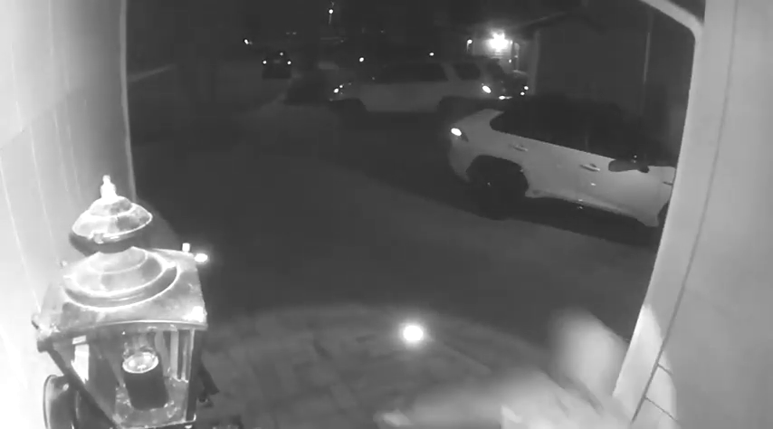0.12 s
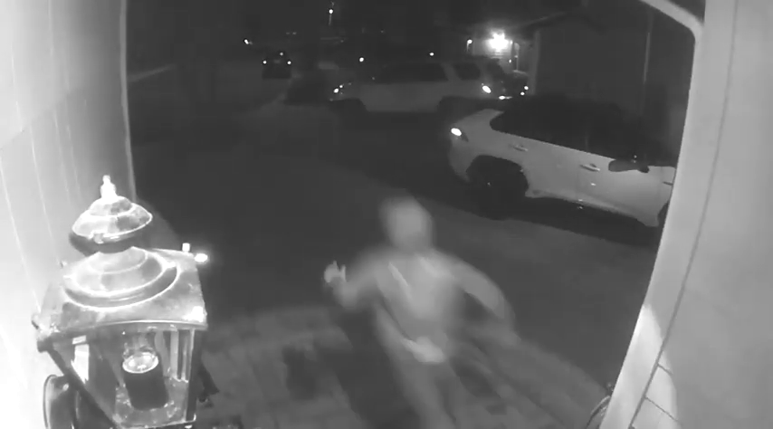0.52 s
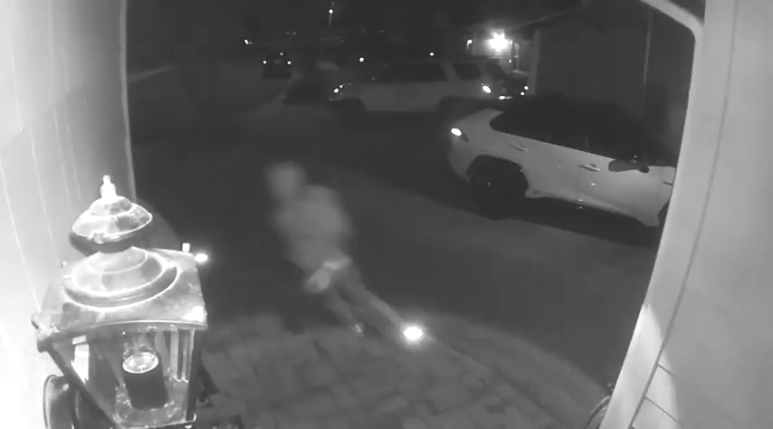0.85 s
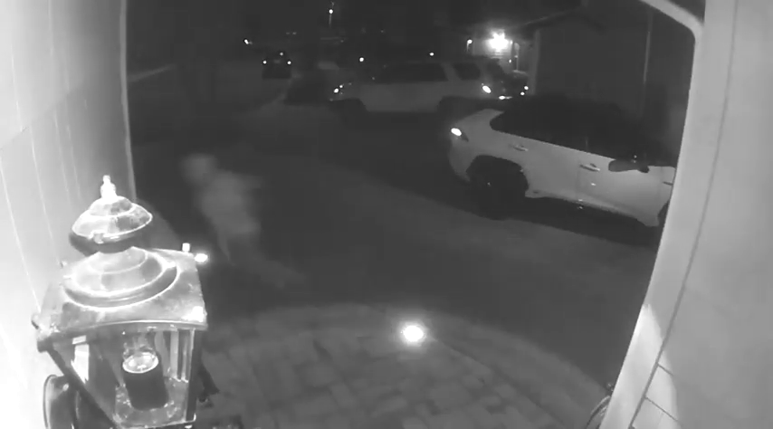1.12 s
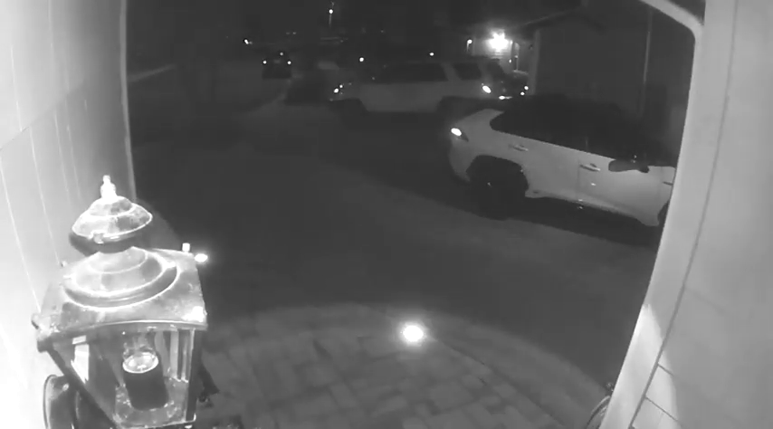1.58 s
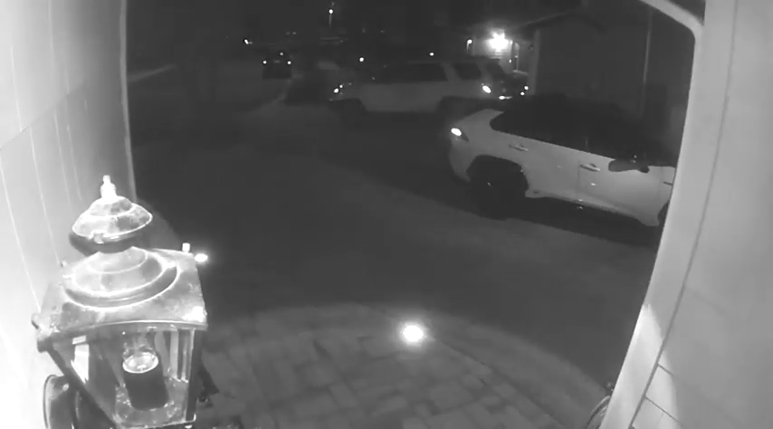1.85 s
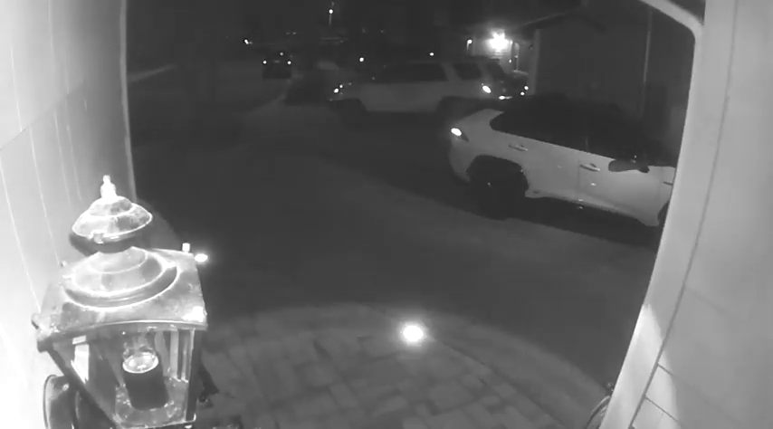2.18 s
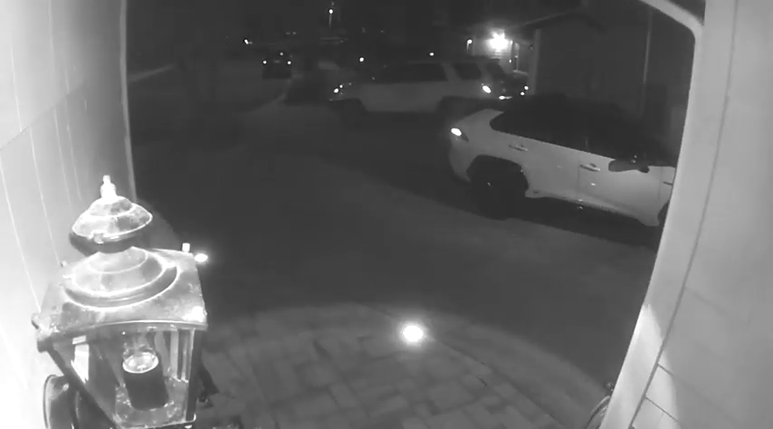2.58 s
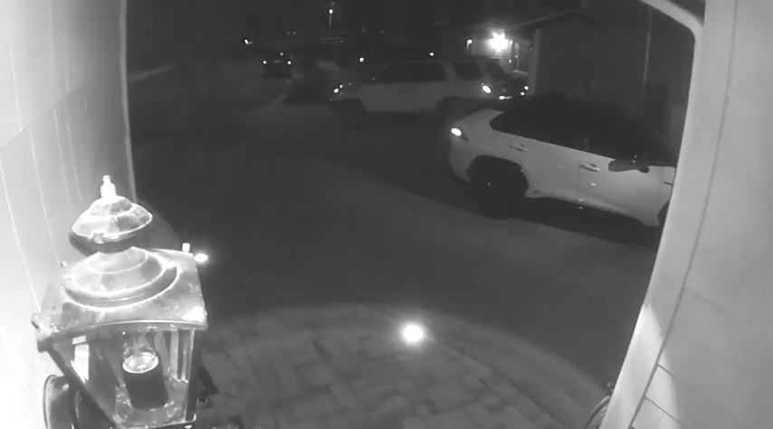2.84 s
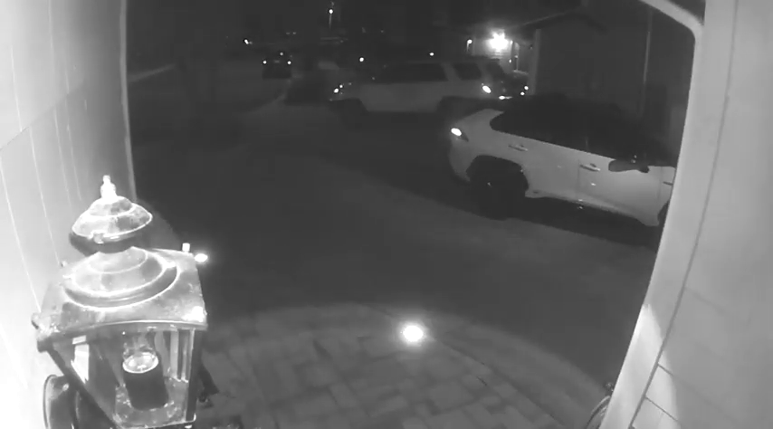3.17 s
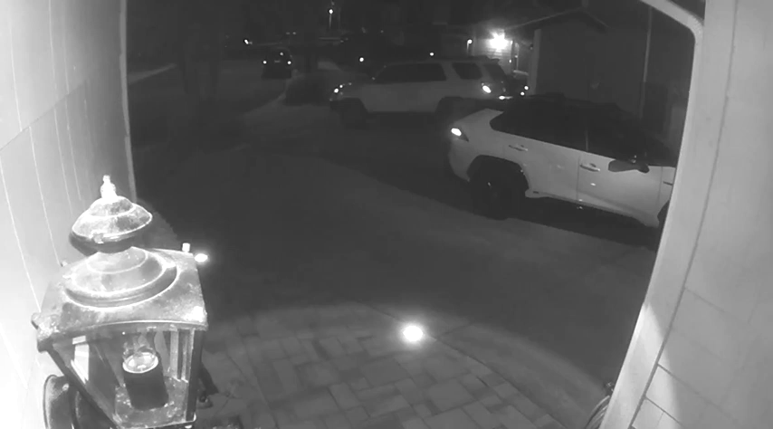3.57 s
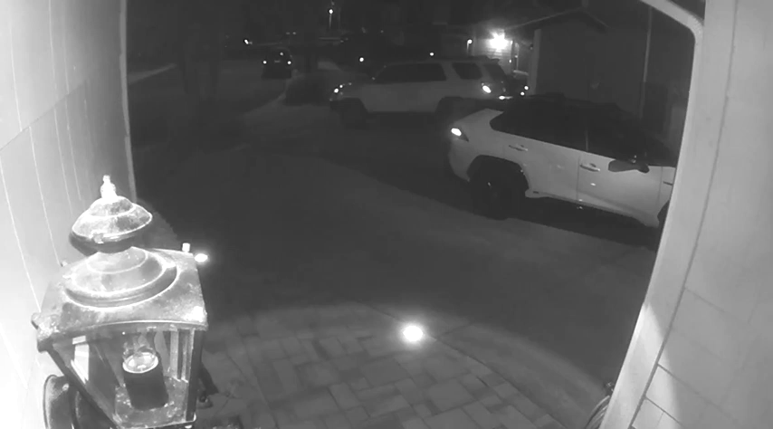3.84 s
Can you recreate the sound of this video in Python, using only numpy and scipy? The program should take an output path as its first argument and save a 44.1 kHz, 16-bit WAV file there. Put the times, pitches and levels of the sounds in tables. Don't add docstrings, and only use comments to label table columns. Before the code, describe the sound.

Someone's hurried footsteps scuff off across paving, following one loud low slam that overloads the microphone

```python
import sys
import numpy as np
from scipy import signal
from scipy.io import wavfile
from scipy.ndimage import uniform_filter1d

SR = 44100
rng = np.random.default_rng(int(sys.argv[2]) if len(sys.argv) > 2 else 0)


def int16_out(signal):
    q = np.round(np.clip(np.atleast_2d(signal).T, -1, 1) * 32767)
    wavfile.write(sys.argv[1], SR, q.astype(np.int16))


def ratio_of_db(decibels):
    return 10 ** (np.asarray(decibels, float) / 20)


N = 176400


def unit_rms(x):
    return x / np.sqrt(np.mean(x ** 2) + 1e-20)


def read_log(points, hz):
    point_hz, value = np.transpose(points)
    return np.interp(np.log(hz + 1), np.log(point_hz + 1), value)


def add(mix, start_s, sound):
    part = mix[round(start_s * SR):][:len(sound)]
    part += sound[:len(part)]


def resonate(x, hz, width_hz):
    turn = np.exp(2j * np.pi * np.cumsum(hz * np.ones(len(x))) / SR)
    r = np.exp(-np.pi * width_hz / SR)
    return 2 * (turn * signal.lfilter([1 - r], [1, -r], x / turn + 1e-18)).real


def thump(level_db, length_s, pitch_hz):
    t = np.arange(SR) / SR
    ring = np.sqrt(2) * np.sin(2 * np.pi * pitch_hz * t)
    return ratio_of_db(level_db) * ring * np.minimum(t * pitch_hz / 0.74, 1) * np.exp(-(t / length_s) ** 3)


def whistle(curve, width_hz):
    point_s, pitch_hz, level_db = np.transpose(curve)
    t = np.arange(N) / SR
    hz = np.interp(t, point_s, pitch_hz)
    fuzz = unit_rms(resonate(resonate(rng.standard_normal(N), hz, width_hz), hz, width_hz))
    level = ratio_of_db(np.interp(t, point_s, level_db, left=-120, right=-120))
    return (np.sin(2 * np.pi * np.cumsum(hz) / SR) + 0.325 * fuzz) * level


# freq_hz, density_db
AIR_SPECTRUM = [(20, -7), (50, -5.5), (90, -15.5), (250, -15), (600, -16), (1000, -21), (5000, -19.5),
                (8400, -21.5)]
# time_s, level_db
GATE_LEVEL = [(0, 21), (.3, 14), (.6, 11.5), (.9, 14), (.97, 7.5), (1.02, 9.5), (1.35, 10.5), (1.48, 6.5),
              (1.55, 5.5), (1.751, 6), (1.86, 4), (2.199, 3.5), (2.7, 5), (2.92, 2.5), (3.3, 0.5),
              (3.55, 3), (4, 1)]


def night_air():
    frames, hz = N // 256 + 5, np.fft.rfftfreq(1024, 1 / SR)
    real, imag, patches = rng.standard_normal((frames, 513, 3)).T
    patches = uniform_filter1d(uniform_filter1d(patches, size=14, axis=0), size=10, axis=1)
    swell = uniform_filter1d(rng.standard_normal(frames), size=12)
    patch_db, swell_db = 1.4 * unit_rms(patches), 1.0 * unit_rms(swell)
    z = (real + 1j * imag) * ratio_of_db(read_log(AIR_SPECTRUM, hz)[:, None] + patch_db + swell_db)
    hiss = ratio_of_db(-63.5) * unit_rms(signal.istft(z, nperseg=1024, noverlap=768)[1][:N])
    gate = ratio_of_db(np.interp(np.arange(N) / SR, *np.transpose(GATE_LEVEL)))

    hum_hz, width_hz = 147.7, 26
    hum = resonate(resonate(rng.standard_normal(N), hum_hz, width_hz), hum_hz, 2 * width_hz)
    return hiss * gate + ratio_of_db(-68.5) * unit_rms(hum)


# pitch_hz, level_db, t60_s
DOOR_MODES = [(37, -31, 0.94), (49.05, 4, 0.3), (57.48, -4.5, 0.52), (76.46, -8.5, .48),
              (94.35, -4.5, 0.23), (115.3, 0.5, 0.31), (127.1, 12.5, 0.16), (140, -10, .55),
              (155.1, -7.5, 0.38), (167.6, -12, 0.38), (220.4, -22, 0.39), (327.6, -12, 0.2),
              (434, -14.5, .16), (599, -18, 0.053)]
# start_s, level_db, length_s, pitch_hz
LEAF_REBOUNDS = [
    (.143, -22.5, .06, 163.2),
    (.26, -48.5, 0.38, 32),
]


def door():
    slam_s, slam_db, pulse_db, pulse_s = 0.002, -1.5, 9, 0.0025
    shock_db, shock_s = -4.36, 0.026
    rattle_db, rattle_t60_s, rattle_per_s = -26.5, 0.41, 2500
    t = np.arange(N) / SR
    clicks = rng.standard_normal(N) * (rng.random(N) < rattle_per_s / SR)
    out = unit_rms(resonate(clicks, 470, 1100)) * ratio_of_db(rattle_db - 60 * t / rattle_t60_s)
    out += ratio_of_db(pulse_db) * np.exp(-(t / pulse_s) ** 2)
    for pitch_hz, level_db, t60_s in DOOR_MODES:
        mode_db = slam_db + level_db + shock_db * np.exp(-t / shock_s) - 60 * t / t60_s
        out += ratio_of_db(mode_db) * np.sin(2 * np.pi * pitch_hz * (t - slam_s))
    for start_s, *row in LEAF_REBOUNDS:
        add(out, start_s, thump(*row))
    return out


# start_s, peak_db,
# pitch_hz, length_cycles
HEEL_TICKS = [(.052, -33, 2080, 10), (.1695, -51, 7100, 12), (.2045, -26, 3420, 1.2), (.205, -30, 5500, 3),
              (.32, -39, 7920, 21), (0.3841, -20, 1880, 3.5), (.385, -36.5, 483, 2.3),
              (.405, -45, 2040, 15), (.423, -44.5, 2110, 12), (0.4507, -40, 2100, 3.5),
              (0.521, -38, 8000, 27), (0.628, -35.5, 7630, 9.1), (.628, -41.5, 2220, 4.6),
              (0.7363, -33, 1710, 2.5), (.737, -43, 800, 4.2), (.7811, -52, 8050, 12),
              (.826, -46, 7150, 10), (.844, -46, 7110, 10), (.8939, -41.5, 7400, 9), (.901, -44, 7600, 8.8),
              (.991, -46, 5800, 4.4), (1.028, -36, 2630, 4.8), (1.058, -29, 5360, 6),
              (1.231, -28.5, 4730, 2.6), (1.503, -26.5, 3660, 1.05), (1.627, -34.5, 3100, 1.8),
              (1.65, -37, 4500, 6.6), (1.6528, -35.5, 4000, 4.7), (1.696, -42.5, 2090, 1.2),
              (1.753, -46, 1210, 1.6), (1.782, -48, 730, 3), (2.185, -60, 1760, 25),
              (2.306, -55.5, 2080, 12), (2.34, -54, 1780, 6), (2.401, -48, 2050, 5.3),
              (2.424, -41.5, 1870, 3), (2.44, -43.5, 2280, 5), (2.545, -37.5, 4770, 9.4),
              (2.547, -46, 1020, 4.3), (2.722, -46, 1200, 4.4), (3.004, -48, 4680, 5.7),
              (3.06, -51, 1690, 3.3), (3.083, -54, 2000, 3.4), (3.32, -50, 333, 0.83),
              (3.356, -48.5, 2210, 7), (3.358, -44, 4800, 3)]


def heel_ticks():
    out = np.zeros(N)
    for start_s, peak_db, pitch_hz, cycles in HEEL_TICKS:
        turns = np.arange(441) / SR * pitch_hz
        shape = np.minimum(2 * turns, 1) * np.exp(-(turns / cycles) ** 2)
        add(out, start_s, ratio_of_db(peak_db) * np.sin(2 * np.pi * turns) * shape)
    return out


def wall_echo(heels):
    wall_s, wall_db, corner_s = 0.0092, -7, 1.4
    out = heels.copy()
    add(out, wall_s, ratio_of_db(wall_db) * heels[:round(corner_s * SR)])
    return out


# freq_hz, t60_s
PORCH_T60 = [(200, 0.64), (600, 0.62), (2000, 0.42), (7000, 0.37)]


def porch_echo(x):
    taps = np.zeros(SR // 2)
    at = np.arange(300, SR // 2 - 20, 20)
    taps[at + rng.integers(0, 20, len(at))] = rng.choice([-1., 1.], len(at))
    hz, t, z = signal.stft(taps, SR, nperseg=256)
    decay_db = -60 * t / read_log(PORCH_T60, hz)[:, None]
    tail = signal.istft(z * ratio_of_db(decay_db), SR, nperseg=256)[1]
    return signal.fftconvolve(x, tail / np.linalg.norm(tail))[:N]


def grit(length_s, level_db, centre_hz, rise_share):
    grains_per_s, spread_db, broad_db, width_hz = 5300, 1.5, -16.5, 0.75 * centre_hz
    t = np.arange(-2205, 6615) / SR
    hit, sign, size = rng.random((len(t), 3)).T
    grains = (hit < grains_per_s / SR) * np.sign(sign - .5) * ratio_of_db(-spread_db * np.log(size + 0.0011))
    hiss = unit_rms(resonate(resonate(grains, centre_hz, width_hz), centre_hz, 2.3 * width_hz))
    hiss = hiss + ratio_of_db(broad_db) * unit_rms(np.diff(grains, prepend=0))
    hiss = signal.sosfilt(signal.butter(3, .45 * centre_hz, "high", fs=SR, output="sos"), hiss)
    skewed = np.where(t < 0, t / rise_share, t / (1 - rise_share))
    return ratio_of_db(level_db) * hiss * np.exp(-abs(skewed / (1.246 * length_s)) ** 2.1)


# peak_s, length_s, level_db, centre_hz
SOLE_SCUFFS = [(.09, 0.018, -44.5, 3830), (0.183, 0.021, -42.5, 4370), (.25, .065, -54, 3930),
               (.36, 0.018, -53, 2280), (0.637, 0.025, -48.5, 2370), (0.668, 0.055, -49.5, 5950),
               (0.85, 0.032, -49.5, 4730), (.9, 0.035, -51.5, 5160), (1.059, 0.019, -39.5, 3400),
               (1.104, 0.11, -45.5, 4500), (1.154, 0.026, -36, 4700), (1.397, 0.029, -43, 4650),
               (1.542, .03, -64, 2300), (1.6, 0.041, -53.5, 3850), (1.655, 0.039, -48, 3920),
               (1.78, 0.057, -63.5, 4900), (1.92, 0.036, -52, 4500), (1.95, 0.044, -59.5, 4200),
               (2.025, 0.057, -59, 6020), (2.216, 0.042, -64, 4300), (2.312, 0.047, -56.5, 3740),
               (2.44, 0.08, -56.5, 1800), (2.445, .04, -59.5, 5200), (2.59, 0.065, -52, 4380),
               (2.758, 0.056, -60.5, 5292), (2.765, 0.046, -57, 1250), (2.996, 0.063, -64, 2004),
               (3.075, 0.046, -61.5, 1837), (3.084, .02, -61, 5500), (3.33, 0.046, -65.5, 4900),
               (3.355, 0.072, -64, 1900), (4, 0.033, -61.5, 4360), (3.689, 0.046, -64.5, 1800),
               (3.786, 0.012, -73, 1900), (3.868, 0.059, -64.5, 1200)]
# peak_s, length_s, level_db, centre_hz
FLAT_SLAPS = [
    (0.3792, 0.034, -38, 3900),
    (0.988, 0.042, -47.5, 4970),
    (1.031, 0.021, -39, 4500),
    (1.231, 0.048, -49.5, 5000),
    (1.503, 0.056, -52.5, 3800),
    (2.549, 0.063, -51.5, 4350),
]


def scuffs():
    out = np.zeros(N)
    for table, rise_share in ((SOLE_SCUFFS, 0.48), (FLAT_SLAPS, 0.015)):
        for peak_s, *row in table:
            add(out, peak_s - 0.05, grit(*row, rise_share))
    return out


# start_s, peak_db, pitch_hz, ring_s, scatter_db (re knock)
FOOTFALLS = [(0.383, -33.5, 905, 0.0026, -10), (0.522, -65, 1190, 0.0034, 13),
             (.736, -35.5, 505, 0.0029, -12), (.990, -39.5, 308, 0.0045, -20), (.999, -42, 308, 0.0037, -6),
             (1.231, -29, 544, 0.0065, -18.5), (1.5026, -33, 1020, 0.0024, -13.5),
             (1.75, -44.5, 533, 0.0043, -5), (2.008, -57, 354, 0.013, -1.5), (2.278, -66, 353, 0.0069, 5.5),
             (2.542, -47.5, 440, 0.0019, 1.5), (2.723, -50, 500, 0.0085, -6),
             (2.958, -62.5, 560, 0.0043, -1.5), (3.353, -58, 1110, 0.003, -2.5),
             (3.666, -62, 303, 0.0058, 1.5), (3.82, -63, 610, 0.0066, 1)]


def footfalls():
    out = np.zeros(N)
    t = np.arange(6615) / SR
    for start_s, peak_db, hz, ring_s, scatter_db in FOOTFALLS:
        knock = np.sin(2 * np.pi * hz * t) * np.exp(-(t / ring_s) ** 3)
        low, high = rng.standard_normal((len(t), 2)).T
        slap = unit_rms(resonate(resonate(low, hz, 0.87 * hz), hz, 0.87 * hz))
        slap = slap * ratio_of_db(-60 * t / 0.17) * np.minimum(t / 0.0064, 1)
        smack = unit_rms(resonate(resonate(high, 640, 1300), 1240, 1200)) * ratio_of_db(-6 - 60 * t / 0.3)
        add(out, start_s, ratio_of_db(peak_db) * (knock + ratio_of_db(scatter_db) * (slap + smack)))
    return out


def runner():
    heels, soles = wall_echo(heel_ticks() + footfalls()), scuffs()
    heel_wet_db, sole_wet_db = -13, -8.5
    out = heels + soles + porch_echo(ratio_of_db(heel_wet_db) * heels + ratio_of_db(sole_wet_db) * soles)
    return signal.sosfilt(signal.butter(4, 260, "high", fs=SR, output="sos"), out)


# time_s, pitch_hz, level_db
SQUEAK_CURVE = [
    (.5, 570, -72),
    (.53, 600, -63),
    (.58, 670, -60),
    (.63, 660, -66),
    (.72, 650, -70),
]


def closer_squeak():
    return whistle(SQUEAK_CURVE, 27)


# start_s, level_db, pitch_hz
GROUND_BOOMS = [
    (1.048, -59.5, 54.6),
    (1.529, -58, 58.6),
    (1.801, -64.5, 53),
    (2.58, -64, 56),
    (2.8, -70, 55),
    (1.27, -69, 59),
    (3.02, -60.5, 57),
]


def ground_booms():
    out = np.zeros(N)
    for start_s, level_db, pitch_hz in GROUND_BOOMS:
        add(out, start_s, thump(level_db, 0.079, pitch_hz))
    return out


# start_s, level_db, length_s, pitch_hz
CAR_THUMPS = [
    (3.195, -58, 0.085, 156),
    (3.215, -54, 0.087, 150),
    (3.288, -58, 0.021, 150),
    (3.3, -60.5, 0.045, 108),
    (3.41, -59.5, 0.046, 147),
    (2.39, -63.5, 0.05, 140),
    (3.66, -69, .05, 100),
    (3.74, -69, 0.12, 150.6),
]


def car_thumps():
    out = np.zeros(N)
    for start_s, *row in CAR_THUMPS:
        add(out, start_s, thump(*row))
    return out


# time_s, pitch_hz, level_db
DRONE_CURVE = [
    (2.7, 225, -84),
    (2.85, 220, -75),
    (3.02, 222, -73),
    (3.12, 205, -79),
    (3.33, 212, -75),
    (3.45, 190, -84),
]


def engine_drone():
    return whistle(DRONE_CURVE, 28.5)


# time_s, pitch_hz, level_db
WHINE_CURVE = [
    (2.96, 310, -80),
    (2.99, 305, -68),
    (3.07, 285, -76),
    (3.14, 240, -74),
    (3.2, 250, -80),
]


def street_whine():
    return whistle(WHINE_CURVE, 30)


def scene():
    near = night_air() + door() + runner() + closer_squeak()
    far = ground_booms() + car_thumps() + engine_drone() + street_whine()
    return (near + far)[None]


def roll_off(x):
    return signal.sosfilt(signal.butter(12, 9090, fs=SR, output="sos"), x)


def record(dry):
    clip, sampling_hz, edge_hz = 0.42, 16000, 7980
    x = dry[0] + ratio_of_db(-3) * resonate(dry[0], 2080, 300)
    x = clip * x / (clip ** 8 + x ** 8) ** (1 / 8)
    x = signal.oaconvolve(x, signal.firwin(301, sampling_hz / 2, fs=SR), "same")
    x = x * (1 + 2 * np.cos(2 * np.pi * sampling_hz * np.arange(N) / SR))
    x = signal.oaconvolve(x, signal.firwin(85, edge_hz, window=("kaiser", 8), fs=SR), "same")
    return roll_off(x[None])


dry = scene()
out = record(dry)
int16_out(out)
```